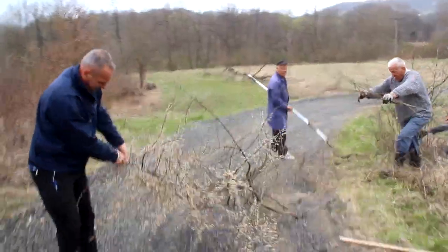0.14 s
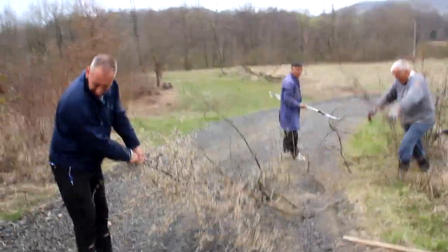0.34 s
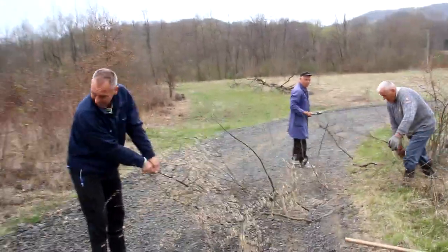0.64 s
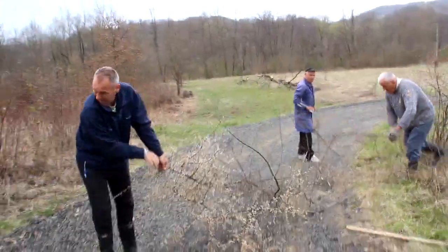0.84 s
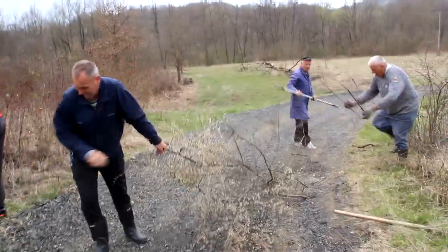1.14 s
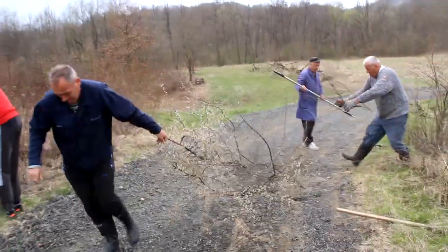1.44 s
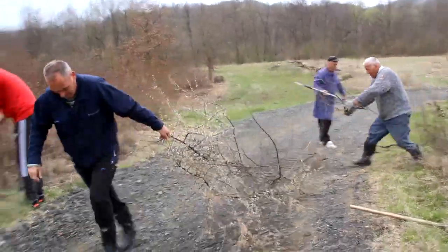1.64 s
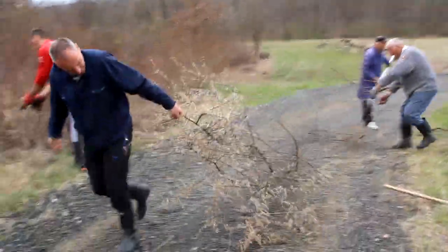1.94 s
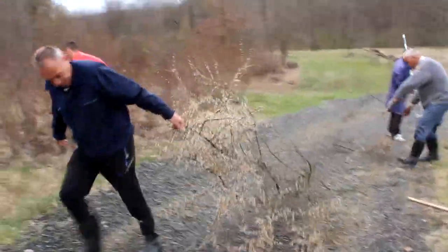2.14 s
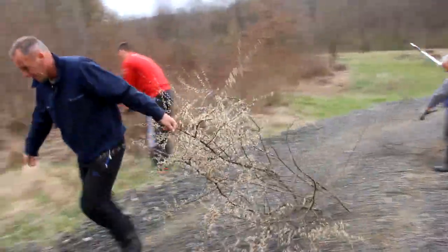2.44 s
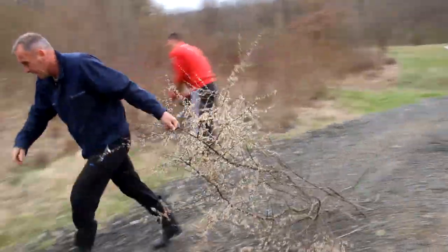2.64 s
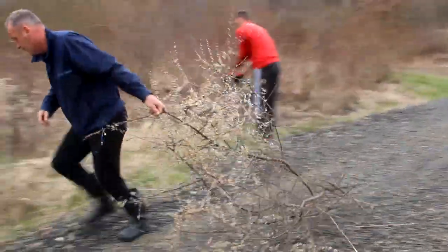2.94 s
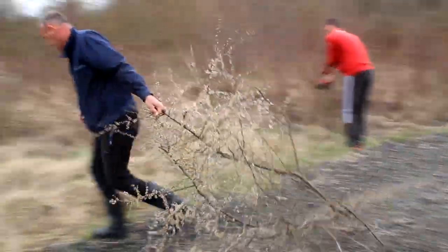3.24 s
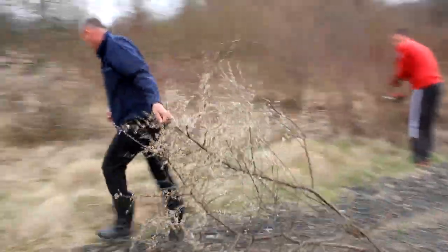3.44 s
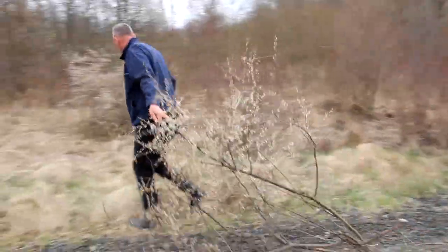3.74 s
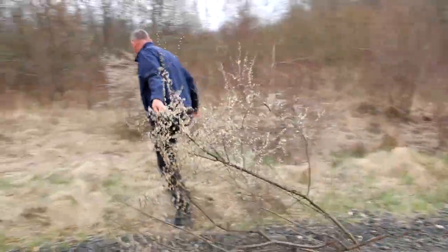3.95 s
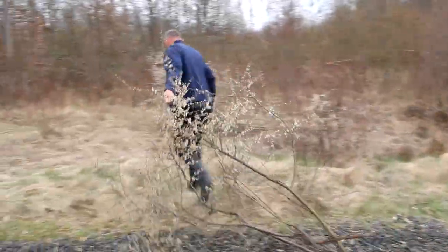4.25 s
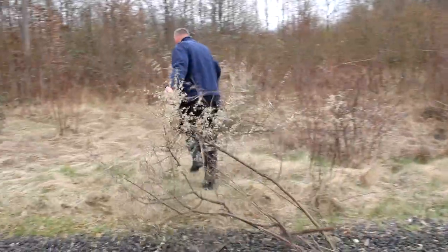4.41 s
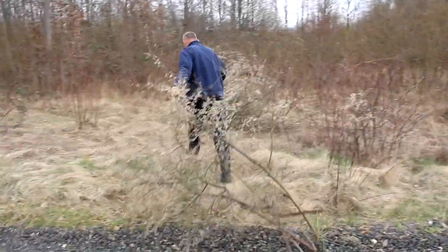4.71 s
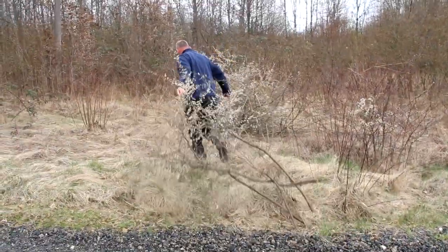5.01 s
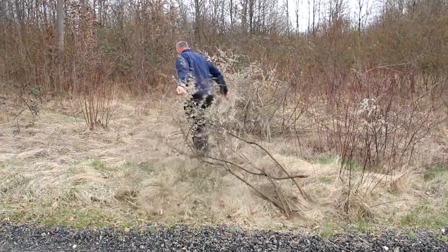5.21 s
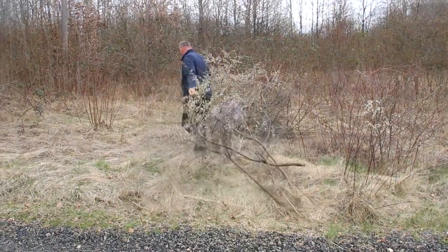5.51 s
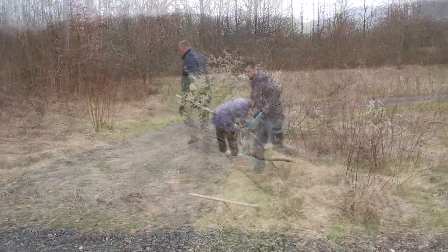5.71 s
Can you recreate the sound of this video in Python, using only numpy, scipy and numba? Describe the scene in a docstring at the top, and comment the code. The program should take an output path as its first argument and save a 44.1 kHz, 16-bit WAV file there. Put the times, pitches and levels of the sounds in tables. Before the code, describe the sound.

Uneven, lurching scrape of dry branches over loose stones, close and dry with no room echo. Early on there are wooden knocks and isolated snaps; around the middle come heavier bumps, boot crunches and one very sharp crack. Then twigs whip and tick thickly through tall grass for about a second, followed by sparser ticks, another snap and a quiet scrape. Faint far-off low hum.

```python
"""A gravel track with dry grass beside it, in the open: a man drags a cut, twiggy branch along, a few metres away.
Dense filtered clicks make stones roll and twig tips scrape; loose flicks and skids crackle over them.
Damped sine swings knock and tick, noise under bell curves gives crunching boots, bursts of wood modes snap.
Shaped noise and wavering low tones lay faint open air and a distant drone underneath."""
import sys
import numpy as np
from scipy import signal
from scipy.fft import rfft, irfft, next_fast_len
from scipy.io import wavfile
from scipy.ndimage import uniform_filter1d
from numba import njit

SR = 44100
rng = np.random.default_rng(int(sys.argv[2]) if len(sys.argv) > 2 else 0)


def generate_wav(sig):
    """Save sig (samples, or channels by samples) to the path in sys.argv[1] as 16-bit PCM at SR."""
    pcm = np.round(np.clip(np.atleast_2d(sig).T, -1, 1) * 32767).astype(np.int16)
    wavfile.write(sys.argv[1], SR, pcm)


N = 258911  # length in samples

# The drag before its lurches: start_s, stones_db, twig_tips_db, dry_rustle_db
DRAG_LEVELS = [(0.0, -44.5, -56, -68), (0.2, -41.5, -50, -53), (0.45, -47.5, -58.5, -64),
               (0.68, -48, -71, -81), (0.88, -45.5, -55, -77), (1.0, -52, -59.5, -72),
               (1.15, -44, -54, -70), (1.55, -42.5, -46, -57), (1.67, -45.5, -48.5, -76),
               (2.03, -39.5, -48, -63), (2.5, -42.5, -42.5, -51), (3.05, -40, -41, -43.5),
               (3.65, -41.5, -44, -52.5), (4.2, -41, -45.5, -47.5), (4.5, -45, -41, -53),
               (5.0, -48, -47.5, -66), (5.5, -46.5, -50.5, -52), (5.87, -42, -52, -58)]
# Distant drone: pitch_hz, level_db
DRONE_TONES = [(54.8, -59), (66.9, -60.5), (134, -64), (147.3, -76)]
# Branch ends and stones knocking on the ground: start_s, level_db (peak of the blow), pitch_hz
KNOCKS = [(.041, -28.5, 288), (0.392, -21, 1040), (.4335, -20, 990), (.593, -37, 420), (.612, -32.5, 360),
          (0.6422, -28.5, 336), (0.6498, -28, 1290), (0.681, -25.5, 318), (0.683, -31, 1290),
          (0.739, -26, 1110), (0.776, -26, 283), (0.827, -33, 400), (.881, -30, 1300), (.895, -24.5, 1230),
          (.9225, -24, 1700), (1.2937, -19, 890), (1.378, -28, 400), (1.854, -23, 294), (1.8655, -25, 1200),
          (1.868, -24, 420), (1.9007, -15, 805), (1.9015, -16, 270), (2.1105, -23, 1700), (2.177, -34, 900),
          (2.2985, -22, 850), (2.303, -16, 1600), (2.3052, -14.5, 900), (2.321, -22, 850),
          (2.338, -29, 1600), (2.349, -28, 930), (2.353, -26, 800), (2.643, -31, 350), (2.649, -25, 132),
          (2.773, -25.5, 650), (2.7806, -17, 1150), (2.8375, -22, 1400), (3.033, -23, 1500),
          (3.1674, -23, 750), (3.169, -20, 266), (3.2328, -26, 687), (3.463, -24, 890), (3.506, -26.5, 790),
          (3.601, -31, 398), (3.607, -25.5, 325), (3.696, -21.5, 1190), (3.7878, -15.5, 910),
          (4.269, -28, 600), (4.572, -27, 980), (4.6457, -17.5, 1070), (5.012, -19.5, 970),
          (5.057, -25, 1500), (5.094, -23, 520), (5.2625, -28.5, 377), (5.483, -30.5, 1480),
          (5.730, -21, 1330)]
# Thin twigs breaking or whipping back: swing_middle_s, level_db (peak of the swing), pitch_hz
TICKS = [(.1565, -21.5, 6800), (.374, -29, 2190), (0.434, -26, 2600), (.7368, -26.5, 3380),
         (1.2015, -24.5, 2600), (1.2259, -17, 4700), (1.294, -25, 11000), (2.1136, -25, 3500),
         (2.29, -19, 2400), (2.5108, -16, 5070), (2.6614, -17.5, 5600), (2.735, -24, 3770),
         (3.0076, -15.5, 3800), (3.06, -18, 7000), (3.0656, -20, 4470), (3.188, -7, 5800),
         (3.234, -17, 4970), (3.3068, -20.5, 4940), (3.5105, -23, 3400), (3.6052, -22.5, 1990),
         (3.6622, -26, 3900), (3.9508, -23, 8000), (3.9775, -19.5, 10000), (4.0343, -17.5, 8800),
         (4.0687, -23, 8000), (4.094, -24, 2200), (4.1175, -20, 9000), (4.1376, -18, 4960),
         (4.1497, -12, 10000), (4.2544, -17, 6000), (4.2731, -15.5, 6140), (4.303, -18.5, 4200),
         (4.34, -12.5, 4600), (4.3495, -14.5, 5800), (4.389, -16, 5300), (4.4117, -15.5, 5100),
         (4.441, -8.5, 5070), (4.4588, -14.5, 6840), (4.486, -23, 5500), (4.5026, -19, 4530),
         (4.5055, -15, 3800), (4.511, -16.5, 4500), (4.519, -21, 5000), (4.527, -13, 5000),
         (4.5374, -14, 6540), (4.603, -15, 8000), (4.6216, -11.5, 4170), (4.749, -14.5, 5640),
         (4.8288, -18.5, 3970), (4.9012, -16.5, 4230), (4.9414, -11, 3760), (5.0573, -17.5, 3850),
         (5.5956, -18.5, 7150)]
# Boots and heavy boughs ploughing the ground: middle_s, half_length_s, thud_db, crunch_db, grit_db
SCUFFS = [(0.25, 0.024, -40, -62, -45.5), (1.213, 0.012, -44, -37.5, -42), (1.872, 0.016, -38, -38, -37),
          (1.902, 0.0049, -29.5, -42, -35), (2.297, 0.01, -31, -29, -31), (2.35, 0.0078, -40, -41.5, -53),
          (2.79, 0.033, -42, -42, -62), (3.187, 0.011, -29.5, -33.5, -19), (3.214, 0.01, -45, -41, -41),
          (5.182, 0.029, -42.5, -47.5, -43), (5.575, 0.026, -42.5, -47, -44)]
# Heavy boughs and heels bumping on soft ground: middle_s, level_db, pitch_hz, half_length_s
BUMPS = [(.27, -42.5, 260, 0.012), (1.913, -33, 288, 0.0021), (1.9495, -31.5, 280, .002),
         (2.295, -26.5, 400, 0.0023), (2.314, -28, 336, .004), (2.749, -33, 260, 0.0026),
         (2.766, -32, 230, 0.0032), (2.812, -32, 290, 0.0041), (3.182, -26.5, 220, 0.00405),
         (3.192, -28, 300, 0.0039), (3.223, -36, 230, 0.0041), (3.239, -34, 262, 0.0048),
         (3.995, -35.5, 215, 0.0058), (5.093, -37, 420, 0.0051), (5.165, -40, 440, .009),
         (5.184, -38, 250, 0.0076), (5.574, -36, 345, 0.0066), (5.595, -33, 320, .008)]
# A stiff twig digs in and scrapes: start_s, length_s, first_pitch_hz, last_pitch_hz, level_db
SCRAPES = [(0.78, 0.21, 1300, 1410, -51), (1.736, 0.11, 3900, 3730, -40.5), (1.98, 0.19, 3650, 3780, -45),
           (3.28, 0.4, 2120, 3800, -42.5), (4.784, 0.23, 3920, 3600, -45)]
# Sticks snapping, each with its own length and thickness:
#   start_s, level_db (before the burst's own strength), tear_s, knock_db (relative to level_db),
#   low_mode_hz, low_mode_db, main_mode_hz, high_mode_hz, high_mode_db, fibres_db (mode and fibre dB over main mode)
SNAPS = [(0.9332, -12, 0.002, -14, 2030, -14, 4410, 6380, -9, -1.5),
         (1.3741, -20, 0.0013, -20, 2420, -6, 5000, 5730, -8, 8),
         (1.3755, -19.5, 0.006, -10, 1650, -3, 2250, 4530, -6, 0),
         (1.387, -27, 0.0054, -8, 1900, -2, 3200, 4900, -8, 4),
         (1.5825, -11.5, 0.0028, -12.5, 2610, -5.5, 4440, 6740, -10, -3),
         (2.2844, -30, 0.0039, -4, 1500, 3, 2500, 4450, -3, 2),
         (2.401, -28, 0.0043, -12, 1960, -2, 3100, 5100, -6, -4),
         (2.4061, -14, 0.004, -1, 2570, 5.5, 5100, 6360, 2.5, 9.5),
         (3.1775, -22, 0.0022, -4, 2500, -8, 4800, 5600, 0, -3),
         (3.391, -12.5, 0.0038, -8.5, 2690, -3, 4130, 6200, -8, 1),
         (3.4605, -25.5, 0.0031, -7, 2920, 3, 4070, 5810, -8, -4),
         (4.599, -28, 0.0025, -7, 2320, 6, 4370, 5670, 2, 6),
         (5.262, -11, 0.0018, -27, 2620, -8.5, 4390, 6100, -4, -5),
         (5.8256, -20.5, .0018, -18, 2400, -8, 4430, 6560, -2, -2)]
# A stick left ringing after it snaps: start_s, pitch_hz, level_db, t60_s
RINGING_STICK = (.934, 2083, -26.5, .07)
# A twig skids over a stone with a short rasp: middle_s, level_db, pitch_hz, half_length_s
RASPS = [(1.183, -39, 12600, 0.0028), (1.2025, -28.5, 4800, .001), (1.223, -39, 4700, .001),
         (1.2405, -36, 5200, 0.00081), (1.311, -44, 4950, .002), (1.3512, -33, 5340, .001),
         (1.363, -33, 5200, .0015), (1.845, -33, 3580, 0.0035), (2.001, -33.5, 3530, 0.0013),
         (2.025, -35, 3500, 0.0022), (2.039, -37, 3770, 0.0026), (2.062, -35, 4140, 0.0026),
         (2.1405, -30.5, 3480, 0.0015), (2.244, -37, 3540, 0.0013), (2.627, -29.5, 1980, 0.0019),
         (2.943, -39, 4200, 0.0024), (2.966, -33, 5000, .002), (2.989, -30, 9100, .001),
         (3.014, -29.5, 3880, 0.0016), (3.0285, -32, 1960, 0.0017), (3.043, -28, 1890, .002),
         (3.0705, -28.5, 1880, 0.0021), (3.424, -35, 2600, .002), (3.553, -34.5, 3250, 0.004),
         (3.586, -36, 3600, 0.0015), (3.593, -30, 3200, .0012), (3.635, -36, 3600, 0.0025),
         (3.659, -31.5, 3820, 0.0029), (4.9415, -31.5, 3450, 0.001), (5.4135, -29.5, 6800, 0.00098)]

# Colours, the relative spectra of each noise: freq_hz, level_db
GRAVEL_COLOUR = [(40, -23), (110, -6), (200, 1.5), (370, 6.5), (560, -5), (1000, 3), (1500, -2), (2000, 0),
                 (4000, -8.5), (9000, -15.5)]
TWIG_COLOUR = [(300, -22), (1200, 2), (2200, -2.5), (4000, 4.5), (6000, 1.5), (8000, -2), (10000, -11.5),
               (16000, -10.5)]
RUSTLE_COLOUR = [(1500, -27), (5000, -56), (8200, 10), (10500, 6.5), (13000, 8.5), (16000, 4.5)]
AIR_COLOUR = [(20, -10), (50, 0), (80, 7.5), (140, -12), (330, -12), (600, 5.5), (1100, 0), (2500, -7),
              (6000, -5), (16000, -48)]
THUD_COLOUR = [(40, -29), (100, -4.5), (170, -0.5), (240, 5.5), (340, 3.5), (550, -7), (1200, -5),
               (4000, -51)]
CRUNCH_COLOUR = [(150, -52), (450, -23), (780, -14), (1700, -16), (3000, -24), (9000, -49)]
GRIT_COLOUR = [(600, -55), (2000, -1), (4500, 5.5), (7500, -0.5), (11000, -3.5), (16000, -11.5)]
SPLINTER_COLOUR = [(30, -48), (200, -10), (800, -3), (1400, -1), (2500, 5), (3250, -3), (4500, 8.5),
                   (6600, -0.5), (7600, -10), (8800, -1.5), (10500, -9), (16000, -16)]

# The branch catches and slips: smoothing time, level swing and flick rate swing
LURCH_S, LURCH_DB, LURCH_FLICKS_DB = 0.012, 0.8, 5
# The crown is pulled through the tall grass of the verge, a bell curve in time
VERGE_MIDDLE_S, VERGE_HALF_S = 4.45, 0.74
# Twigs spring free: everywhere, and what the verge adds at its middle; dB over the twig tips
FLICKS_PER_S, VERGE_EXTRA_FLICKS_PER_S = 65, 110
FLICK_DB, VERGE_EXTRA_FLICK_DB = 7, 4
# Faint rasps all along the drag: dB over the twig tips, usual pitch and half length
SKIDS_PER_S, SKID_DB, SKID_HZ, SKID_HALF_S = 75, 2.5, 4500, 0.0008
# Loose stones knock together: dB over the rolling stones, usual pitch
PEBBLES_PER_S, PEBBLE_DB, PEBBLE_HZ = 45, 5, 1200
# The quiver after a twig's click: level under the swing's peak, decay
QUIVER_DB, QUIVER_S = -17, 0.0029
# Stones roll on after a scuff: level under its thud and crunch, decay
SPILL_DB, SPILL_S = -5.5, 0.047
# Stones squeezed out from under a scuff: rate at full weight, dB over the crunch, usual pitch
STONES_PER_S, STONE_DB, STONE_HZ = 300, 7, 1100
SCRAPE_FADE_S = 0.043  # a scraping twig bites and lets go in this time
# Resonance widths as a share of the pitch
BUMP_WIDTH, SCRAPE_WIDTH, STICK_WIDTH, RASP_WIDTH = 0.15, 0.55, 0.028, 0.18
# A snapping stick: octave of its main mode (dB over that mode), attack
OCTAVE_DB, SNAP_ATTACK_S = -15, 0.00025
TOP_HZ = 15800


def undb(db):
    """Decibels to gain."""
    return 10 ** (np.asarray(db) / 20)


def unit(x):
    """Scale to rms 1."""
    return x / np.sqrt(np.mean(x ** 2))


def curves(table):
    """Draw each column of a timed table as a curve, sample by sample."""
    s, *columns = np.transpose(table)
    return [np.interp(np.arange(N) / SR, s, column) for column in columns]


def colour(x, points):
    """Filter by a spectrum of (freq_hz, level_db) points; rms 1."""
    point_hz, point_db = np.transpose(points)
    size = next_fast_len(len(x))
    freq_hz = np.maximum(np.fft.rfftfreq(size, 1 / SR), 1)
    gain = undb(np.interp(np.log(freq_hz), np.log(point_hz), point_db))
    return unit(irfft(rfft(x, size) * gain, size)[:len(x)])


def add(out, s, x):
    """Mix x into out from time s on."""
    i = int(s * SR)
    out[i:i + len(x)] += x[:N - i]


def low_cut(x, hz):
    """Small things radiate no bass."""
    return signal.sosfilt(signal.butter(2, hz, "high", fs=SR, output="sos"), x)


def mode(t, hz, width_hz):
    """A resonance whose randomly wandering phase widens its line; rms 1."""
    wander = np.cumsum(rng.standard_normal(len(t))) * np.sqrt(2 * np.pi * width_hz / SR)
    return np.sqrt(2) * np.sin(2 * np.pi * hz * t + wander)


@njit
def resonate(x, hz, width):
    """Band-pass with a moving centre; width is a share of the centre."""
    y, band, low = np.empty(len(x)), 0., 0.
    for i in range(len(x)):
        g = np.tan(np.pi * hz[i] / SR)
        v = (band + g * (x[i] - low)) / (1 + g * (g + width))
        band, low, y[i] = 2 * v - band, low + 2 * g * v, width * v
    return y


def band_noise(size, hz, width):
    """Noise in one resonance; rms 1."""
    return unit(resonate(rng.standard_normal(size), np.full(size, float(hz)), float(width)))


def contacts(rate, spread_db):
    """Impulses of random contacts per second, mostly tiny with a few big ones."""
    most_db = 28
    chance, draw, sign = rng.random(N), rng.exponential(size=N), rng.choice([-1, 1], N)
    force = undb(most_db * np.tanh(spread_db * draw / most_db))
    return (chance < rate / SR) * sign * force


def scatter(x, tail_s, tail_db):
    """Each contact lies elsewhere, so ground and brush throw back a different short tail for each."""
    keep = np.exp(-2 / (tail_s * SR))
    energy = signal.lfilter([1 - keep], [1, -keep], x ** 2)
    return x + undb(tail_db) * np.sqrt(energy) * rng.standard_normal(N)


def even(x):
    """Take out the slow swell of a stream of grains, leaving its crackle."""
    return x / np.sqrt(uniform_filter1d(x ** 2, size=SR // 8) + 1e-12)


def click(hz):
    """One brittle swing of about a cycle, peak 1, its middle crossing zero 1/hz seconds in, with a faint quiver."""
    t = np.arange(SR // 70) / SR
    turns = hz * t - 1
    swing = np.sin(2 * np.pi * turns) * np.exp(-np.abs(turns) / 0.3)
    quiver = band_noise(len(t), hz, 1.0) * np.exp(-t / QUIVER_S)
    return swing / np.abs(swing).max() + undb(QUIVER_DB) * quiver


def shower(rate, db, hz):
    """Clicks at random moments, each with its own pitch and force; the thinner, the higher and lighter."""
    out = np.zeros(N)
    chance, thinness, force = rng.random(N), rng.standard_normal(N), rng.standard_normal(N)
    for i in np.flatnonzero(chance < rate / SR):
        pitch_hz = min(hz * np.exp(0.36 * thinness[i]), 12000)
        level_db = db[i] + 5 * np.tanh(force[i]) - thinness[i]
        add(out, i / SR, undb(level_db) * click(pitch_hz))
    return out


def rub(hz, half_s, width):
    """A resonance that swells and dies while a contact lasts, loudest in the middle."""
    reach_s = 3 * half_s
    t = np.arange(-reach_s, reach_s, 1 / SR)
    return mode(t, hz, width * hz) * np.exp(-0.5 * (t / half_s) ** 2)


def rubs(table, width):
    """One swelling resonance for each row, centred on its time."""
    out = np.zeros(N)
    for middle_s, db, hz, half_s in table:
        sound = rub(hz, half_s, width)
        start_s = max(middle_s - len(sound) / SR / 2, 0)
        add(out, start_s, undb(db) * sound)
    return out


def lurches():
    """The uneven pull as the branch catches and slips: twice-smoothed noise, spread 1."""
    size = int(LURCH_S * SR)
    return unit(uniform_filter1d(uniform_filter1d(rng.standard_normal(N), size=size), size=size))


def bunching(lurch):
    """How many times more or fewer flicks and skids a lurch brings."""
    return undb(LURCH_FLICKS_DB * np.tanh(lurch))


def gravel(db):
    """Stones roll and grind under the boughs: dense dull clicks."""
    stones = scatter(contacts(rate=2500, spread_db=3.5), tail_s=0.0054, tail_db=1.0)
    return even(colour(stones, GRAVEL_COLOUR)) * undb(db)


def twigs(twig_db, rustle_db):
    """Countless twig tips brush the ground; each touch is a woody click with a bright dry edge."""
    touches = scatter(contacts(rate=1700, spread_db=4.2), tail_s=0.002, tail_db=-7)
    husks = contacts(rate=2500, spread_db=3.4)
    wood = even(colour(touches, TWIG_COLOUR))
    edge = even(colour(unit(touches) + unit(husks), RUSTLE_COLOUR))
    return wood * undb(twig_db) + edge * undb(rustle_db)


def shifting(x, patchy_db):
    """Ever different twigs and stones bear on the ground, so small resonances come and go in the scraping."""
    spectra = signal.stft(x, nperseg=512)[2]
    patches = uniform_filter1d(rng.standard_normal(spectra.shape), size=5, axis=0)  # across pitch
    patches = uniform_filter1d(patches, size=6, axis=1)  # across time
    return signal.istft(spectra * undb(patchy_db * unit(patches)))[1][:N]


def flicks(twig_db, lurch):
    """Twigs hook and spring free in bunches of dry ticks, more often and harder in tall grass."""
    in_verge = np.exp(-0.5 * ((np.arange(N) / SR - VERGE_MIDDLE_S) / VERGE_HALF_S) ** 2)
    rate = (FLICKS_PER_S + VERGE_EXTRA_FLICKS_PER_S * in_verge) * bunching(lurch)
    return shower(rate, twig_db + FLICK_DB + VERGE_EXTRA_FLICK_DB * in_verge, hz=6460)


def skids(twig_db, lurch):
    """Twigs skid over stones in bunches, each rasp with its own pitch, force and length."""
    at = np.flatnonzero(rng.random(N) < SKIDS_PER_S * bunching(lurch) / SR)
    thinness, force, length = np.tanh(rng.standard_normal((len(at), 3))).T
    level_db = twig_db[at] + SKID_DB + 4 * force
    rows = zip(at / SR, level_db, SKID_HZ * 2 ** thinness, SKID_HALF_S * 2 ** length)
    return rubs(rows, RASP_WIDTH)


def pebbles(gravel_db):
    """Loose stones knock together at random as single clicks over the rolling."""
    return shower(PEBBLES_PER_S, gravel_db + PEBBLE_DB, PEBBLE_HZ)


def distance():
    """Still open air as shaped noise, and a low beating drone of wavering tones, as of engines idling far off."""
    t = np.arange(N) / SR
    drone = sum(undb(db) * mode(t, hz, width_hz=0.59) for hz, db in DRONE_TONES)
    return drone + undb(-54.5) * colour(rng.standard_normal(N), AIR_COLOUR)


def knocks():
    """The ground damps a knock within two cycles; loosened grit rattles with it."""
    out, t = np.zeros(N), np.arange(SR // 25) / SR
    for s, db, hz in KNOCKS:
        turns = hz * t
        blow = np.sin(2 * np.pi * turns) * turns * np.exp(-turns / 0.36)
        rattle = colour(rng.standard_normal(len(t)), CRUNCH_COLOUR) * np.exp(-t / 0.0038)
        add(out, s, undb(db) * (blow / np.abs(blow).max() + undb(-14) * rattle))
    return low_cut(out, 157)


def ticks():
    """Single twigs stand out from the crackle, each one brittle click."""
    out = np.zeros(N)
    for middle_s, db, hz in TICKS:
        add(out, middle_s - 1 / hz, undb(db) * click(hz))
    return out


def scuffs():
    """Weight comes down and slides: the soil thuds, stones crunch, knock and roll on, and grit sprays."""
    middle_s, half_s, thud_db, crunch_db, grit_db = np.transpose(SCUFFS)
    since = np.arange(N) / SR - middle_s[:, None]
    pressure = np.exp(-0.5 * (since / half_s[:, None]) ** 2)
    spill = undb(SPILL_DB) * (since > 0) * np.exp(-np.abs(since) / SPILL_S)
    rolling = np.maximum(pressure, spill)
    soil, stones, grit = (contacts(rate=3000, spread_db=2.0) for _ in range(3))
    squeezed = shower(STONES_PER_S * rolling.max(axis=0), np.full(N, STONE_DB), STONE_HZ)
    thud = undb(thud_db) @ rolling * colour(soil, THUD_COLOUR)
    crunch = undb(crunch_db) @ rolling * (colour(stones, CRUNCH_COLOUR) + squeezed)
    spray = undb(grit_db) @ pressure * colour(grit, GRIT_COLOUR)
    return thud + crunch + spray


def bumps():
    """Boughs and heels press on soft ground, which answers with a short low swell."""
    return low_cut(rubs(BUMPS, BUMP_WIDTH), 150)


def scrape():
    """A stiff twig sticks and slips over the ground; its pitch glides as its free length changes."""
    out = np.zeros(N)
    slips = scatter(contacts(rate=900, spread_db=4.5), tail_s=0.0015, tail_db=-6)
    for s, length_s, first_hz, last_hz, db in SCRAPES:
        stroke = slips[int(s * SR):int((s + length_s) * SR)]
        t = np.arange(len(stroke)) / SR
        hz = np.geomspace(first_hz, last_hz, len(t))
        bite = np.clip(np.minimum(t, length_s - t) / SCRAPE_FADE_S, 0, 1)
        ring = resonate(resonate(stroke, hz, SCRAPE_WIDTH), hz, SCRAPE_WIDTH)
        add(out, s, undb(db) * bite * even(ring))
    return out


def snaps():
    """Fibres give way in a burst of a few milliseconds that rings the stick and jolts the branch."""
    out, t = np.zeros(N), np.arange(SR // 12) / SR
    for s, db, tear_s, knock_db, low_hz, low_db, main_hz, high_hz, high_db, fibre_db in SNAPS:
        onset = np.minimum(t / SNAP_ATTACK_S, 1)
        burst = onset * (np.exp(-(t / tear_s) ** 2) + 0.22 * np.exp(-t / (2.3 * tear_s)))
        modes = [(low_hz, low_db), (main_hz, 0), (high_hz, high_db), (2 * main_hz, OCTAVE_DB)]
        stick = sum(undb(mode_db) * mode(t, hz, STICK_WIDTH * hz) for hz, mode_db in modes)
        fibres = colour(rng.standard_normal(len(t)), SPLINTER_COLOUR)
        crack = unit((stick + undb(fibre_db) * fibres) * burst)
        jolt = undb(knock_db) * onset * mode(t, 850, 90) * np.exp(-t / (tear_s * 0.78))
        echo = undb(-25) * fibres * np.exp(-t / 0.017)  # thrown back by ground and bushes
        add(out, s, undb(db) * (crack * burst.std() + jolt + echo))
    return low_cut(out, 480)


def ringing_stick():
    """One rough note dies away after a snap."""
    out, t = np.zeros(N), np.arange(SR // 5) / SR
    s, hz, db, t60_s = RINGING_STICK
    add(out, s, undb(db - 60 * t / t60_s) * mode(t, hz, width_hz=35))
    return out


def rasps():
    """Single twigs skid over a stone, each a short swell of one rough resonance."""
    return rubs(RASPS, RASP_WIDTH)


def scene():
    """The drag and its single blows in the open."""
    gravel_db, twig_db, rustle_db = curves(DRAG_LEVELS)
    lurch = lurches()
    drag = shifting(gravel(gravel_db) + twigs(twig_db, rustle_db) + scrape(), patchy_db=1.8)
    crackle = flicks(twig_db, lurch) + skids(twig_db, lurch) + pebbles(gravel_db)
    blows = knocks() + ticks() + snaps() + ringing_stick()
    rubbing = bumps() + rasps()
    return (drag * undb(LURCH_DB * lurch) + crackle + blows + rubbing + scuffs() + distance())[None]


def record(dry):
    """The camera rounds the loudest cracks by soft saturation and cuts the top with a steep low-pass."""
    ceiling = 1.1
    rounded = ceiling * np.tanh(dry / ceiling)
    return signal.sosfilt(signal.ellip(10, 0.2, 70, TOP_HZ, fs=SR, output="sos"), rounded)


dry = scene()
out = record(dry)
generate_wav(out)
```